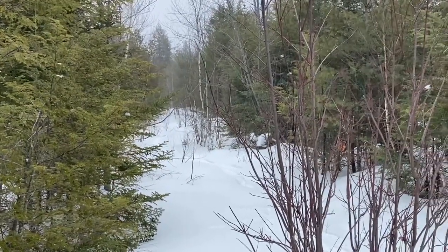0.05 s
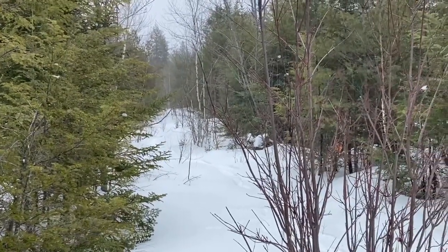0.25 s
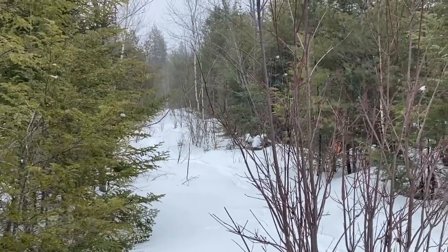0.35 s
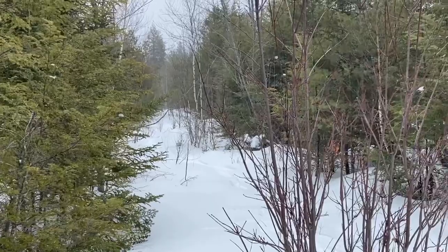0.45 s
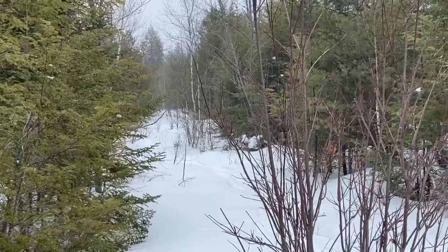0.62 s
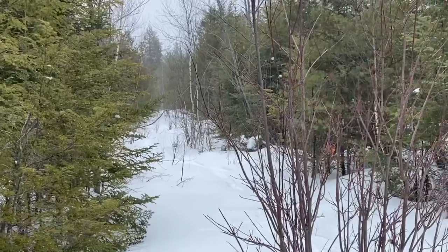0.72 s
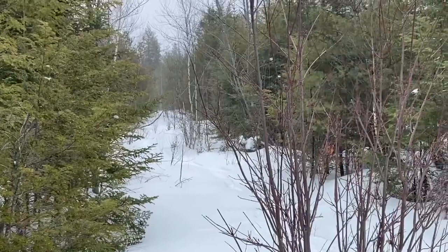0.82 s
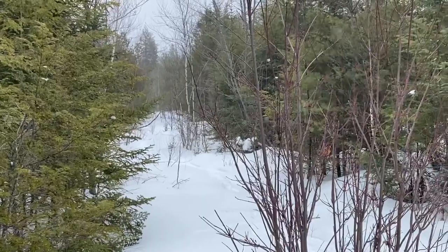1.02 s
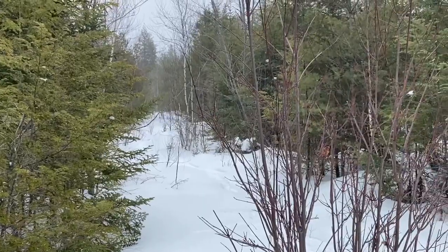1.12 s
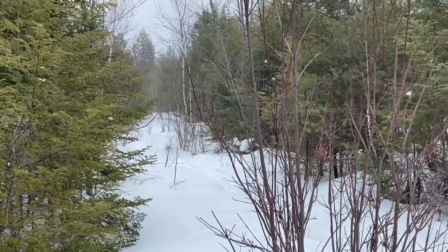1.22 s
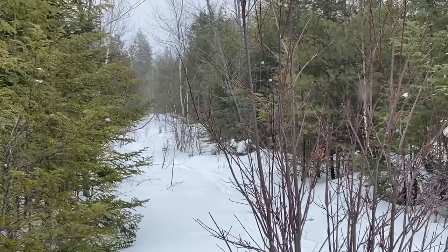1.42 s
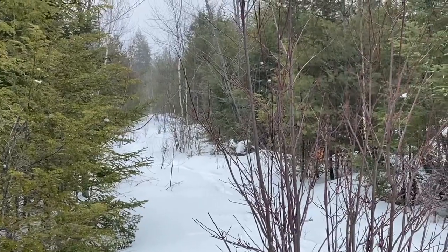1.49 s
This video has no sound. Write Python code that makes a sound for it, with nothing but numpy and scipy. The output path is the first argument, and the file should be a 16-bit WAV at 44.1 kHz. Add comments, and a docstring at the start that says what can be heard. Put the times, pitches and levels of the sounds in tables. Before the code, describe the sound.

Hunting dogs yelp and bawl one after another, their cries ringing through still winter trees

```python
"""Snowy woods in still winter air, with hounds giving tongue on a scent: the end of a far call, a high yelp
that breaks downward, a bawl that starts clean and turns hoarse, and a weaker hoarse bay. Each voice is a stack
of harmonics that gives way to a rasp ringing the throat; the trees scatter it into a long tail of shaped noise.
Small birds whistle faintly as arched sine glides, a few ice grains tick close by as bursts of filtered noise,
and coloured noise makes the low rumble and faint hiss of the air."""
import sys
import numpy as np
from scipy import signal
from scipy.fft import rfft, irfft
from scipy.io import wavfile
from scipy.ndimage import uniform_filter1d

SR = 44100
rng = np.random.default_rng(int(sys.argv[2]) if len(sys.argv) > 2 else 0)


def unload_audio(sound):
    """Save the sound as a 16-bit wav file, at the path given as the first command line argument."""
    columns = np.transpose(np.atleast_2d(sound))
    # keep every value between -1 and 1, then stretch to whole-number steps
    steps = np.round(np.clip(columns, -1, 1) * 32767)
    wavfile.write(sys.argv[1], SR, steps.astype(np.int16))


N = 68355
TIME = np.arange(N) / SR

# Course of each call: start_s, pitch_hz, level_db, second_harmonic_db, higher_harmonics_db,
# half_pitch_db, roughness (0-1, held to 0.95); the levels are fader moves on the voice's parts
FAR_CALL = [(0.0, 798.4, -57.5, -10, -7, -37.5, 0.11), (0.03, 971, -63, -9, -15.5, -34, 0.2),
            (0.06, 1150, -70.5, -6, -17.5, -32, 0.2), (0.08, 1040, -78.5, -17.5, -20.5, -22.5, .2)]
YELP = [(0.174, 1156, -46, -1, 6.5, -39.5, .01), (0.189, 1278, -41.5, 3.5, 2, -41, 0.0047),
        (0.213, 1385, -33.5, -4, 7.5, -34, .002), (0.229, 1343, -28.5, 3, -1.5, -37.5, 0.0009),
        (0.249, 1304, -26.5, -2.5, -4, -34.5, 0.0028), (0.261, 1287, -19.5, -5, -9, -34, 0.0012),
        (0.288, 1283, -18.5, -13.5, -11.5, -36.5, 0.0013), (0.308, 1285, -21, -5, -14, -18.5, 0.0029),
        (0.319, 1227, -29, -2, -4.5, -16, 0.013), (0.326, 1036, -27, -11, -25, -29.5, 0.026),
        (0.333, 864, -22, -11.5, -30, -37.5, .03), (0.341, 753, -25, -2, -21, -24.5, 0.029),
        (0.348, 605, -43, -12, -39.5, -24.5, 0.025)]
BAWL = [(0.624, 836.1, -35.5, 3, -4, -31, 0.04), (0.633, 891.9, -35.5, -4.5, 1, -25.5, 0.026),
        (0.648, 1077, -30.5, 3.5, 2.5, -17.5, 0.046), (0.676, 1084, -29.5, -0.5, -1, -20, .07),
        (0.686, 1138, -27.5, -18, -22, -24, 0.53), (0.700, 1188, -25, -17, -20, -9, .5),
        (0.734, 1213, -23.5, -24, -20, -5, 0.63), (0.757, 1152, -28.5, -6.5, -6, -14.5, 0.45),
        (0.772, 1101, -32.5, 4, -8, -36.5, 0.2), (0.790, 1038, -33, -21, -4, -20, 0.069),
        (0.805, 884, -36.5, -4.5, -8, -26, 0.16), (0.819, 752, -37, -17.5, -23, -19, 0.092)]
BAY = [(1.344, 874.3, -47.5, -20, 2, -23, 0.011), (1.356, 876.8, -36.5, -19, -4, -28, 0.0064),
       (1.371, 903.4, -42, 6, 6, -23, 0.031), (1.378, 997.4, -39, 3.5, 2, -18, .3),
       (1.395, 1024, -44.5, 17.5, 6.5, 6, 0.48), (1.412, 1184, -38.5, 1, 6, -34, 0.45),
       (1.432, 1030, -39, -10, -12, -31, 0.52), (1.455, 1050, -36.5, -11, -11, -13, 0.48),
       (1.475, 1116, -43.5, -15, -6, 4, 0.61), (1.500, 1165, -48, -8, -8, 13.5, 0.98),
       (1.525, 1160, -54, 18, 10, -11, 1)]
# Base strength of harmonics 1, 2, 3 .. in each voice, before the call and the mouth shape them: level_db
FAR_HARMONICS = [0, 0, -2.5]
YELP_HARMONICS = [-1, -11, -26.5, -28, -39, -39]
BAWL_HARMONICS = [0.5, -10.5, -14.5, -29, -46.5, -36.5]
BAY_HARMONICS = [1.5, -23, -19, -24.5]
# Throat and mouth resonances of the hoarse voice: centre_hz, width_hz (before narrowing), relative level_db
BAWL_THROAT = [(550.5, 49, 3), (706, 89, 6.5), (1157, 220, 0.5), (1622, 250, -8), (2316, 130, -6.5),
               (2983, 67, -21.5)]
BAY_THROAT = [(581, 120, 2.5), (719, 120, 1), (1036, 53, -5), (1492, 360, -9), (2327, 82, -5.5),
              (3070, 310, -14.5)]
# How the open mouth passes the overtones: frequency_hz, gain_db
MOUTH_COLOUR = [(600, -13), (1500, 2.5), (2200, 1), (2700, -3.5), (2950, -8), (3250, -7), (3700, -13),
                (4900, -13.5), (5200, -9), (8000, -5.5), (11000, -35)]
# Stereo balance of the direct hounds: frequency_hz, left_minus_right_db
HOUND_PAN = [(600, -3.5), (1200, -4), (1700, 1.8), (2300, 0)]

# Echoes off single trunks: delay_s, level_db
TRUNK_ECHOES = [(.019, -18.5), (0.042, -27)]
# What the trees send back, far and near: frequency_hz, gain_db
FAR_TREES_COLOUR = [(700, -4), (1020, -1.5), (1200, 2), (1500, -3.5), (2200, -0.5), (2600, -7.5),
                    (3400, -28)]
NEAR_TREES_COLOUR = [(400, -23), (700, -2), (1000, -1.5), (1200, 1), (1400, -1.5), (1700, 1), (2300, 2.5),
                     (2650, 4), (3000, 2), (4000, 7.5), (5300, 8.5), (12000, 4.5)]
# Left-right likeness of the scatter: frequency_hz, likeness (0 to 1)
SCATTER_LIKENESS = [(600, 0), (1200, 0.2), (1700, 1), (2300, 0.98), (5000, 0.96)]

# Bird whistles: start_s, length_s, start_hz, end_hz, level_db (before the direct and scatter gains)
BIRDS = [(0.059, 0.04, 4180, 4056, -74.5), (0.116, 0.06, 3990, 3780, -77.5),
         (0.139, 0.042, 7120, 7710, -76), (0.366, 0.058, 7200, 7660, -73.5), (0.846, 0.11, 6070, 6080, -78)]
# Ice grains: start_s, level_db (before the band filters), centre_hz
TICKS = [(.3194, -41.5, 7450), (0.625, -38.5, 11040), (.928, -46, 4500), (1.1445, -40, 8200),
         (1.4082, -29.5, 8850)]
# Left-right likeness of the ticks: frequency_hz, likeness (-1 to 1)
TICK_LIKENESS = [(4000, 0.63), (7000, 0.16), (10000, 0.48)]

# Spectrum of the still air: frequency_hz, relative density_db (per hertz)
AIR_COLOUR = [(25, -21), (45, -8), (75, 2.6), (130, 0), (250, -3), (500, -6), (1100, -5), (2200, -15),
              (3600, -24), (5500, -21), (7500, -16), (9000, -19), (12500, -18), (14000, -26), (15500, -20)]
# Left-right likeness of the air: frequency_hz, likeness (0 to 1)
AIR_LIKENESS = [(60, 1), (300, 0.62), (1000, .6), (3000, 1), (6000, 1), (8000, 0.26), (12000, 0.32)]

# Hound voices; every _RATE_HZ is the lowpass corner of a random drift
HOARSE_BAND_HZ, HOARSE_HISS_DB = (629, 2750), -38.5
VOICE_LOW_HZ = 520   # the voices are rolled off below this
ATTACK_S, RELEASE_S = 0.0021, 0.0021
WAVER, JITTER, JITTER_RATE_HZ = .003, .06, 180   # pitch scatter as a fraction: clean, and added per unit roughness
SHIMMER_DB, SHIMMER_RATE_HZ = 3.5, 124   # level scatter of the note per unit roughness
BLUR_RAD, BLUR_RATE_HZ = 4, 350   # phase scatter per harmonic step above the second, per unit roughness
# The throat strains and gives: its ring runs early and late, which bends the resonances
THROAT_WANDER_S, THROAT_WANDER_RATE_HZ = 0.00019, 22.8
HOUND_LAG_S = .00002   # the left ear hears them later
SCATTER_EVENING = 0.36   # share of a call's swell that comes from facing the listener, missing in the scatter

# Woods
NEAR_TREES_DB, NEAR_TREES_T60_S = -7.5, 0.67
FAR_TREES_DB, FAR_TREES_T60_S = -18.5, 2.13
SCATTER_BUILD_S = 0.01
RUN_SWAY_S, RUN_SWAY_RATE_HZ = 0.00015, 13.5   # the echo paths change as the hounds run

# Birds, ice and air
BIRD_ARCH_HZ, BIRD_WAVER, BIRD_WAVER_RATE_HZ = 100, 0.0073, 140   # the waver is a fraction of pitch
BIRD_DIRECT_DB, BIRD_SCATTER_DB = 0.5, 3
TICK_DECAY_S, TICK_TOP_HZ = 0.00062, 11860
TICK_WIDTH = 1.31   # ratio of band edge to centre
LOW_CHIRP_DB, LOW_CHIRP_START_HZ, LOW_CHIRP_DECAY_S = -45.5, 417, 0.0058
LOW_CHIRP_SAG_S = 0.0071   # time constant of the sine's fall in pitch
AIR_DB = -65.5
TOP_STOP_HZ = 16400


def hound(call, harmonics, throat, breath, rasp_db, scatter_db, scatter_treble_db):
    """A clean note gains half-pitch lines, jitter and rasp as it breaks up: (to the listener, to the trees)."""
    s, *columns = np.transpose(call)
    hz, db, second_db, higher_db, half_db, rough = [np.interp(TIME, s, column) for column in columns]
    rough = np.clip(rough, 0, .95)
    pitch_scatter = (WAVER + JITTER * rough) * drift(JITTER_RATE_HZ)
    phase = 2 * np.pi * np.cumsum(hz * (1 + pitch_scatter)) / SR

    # High overtones lose their footing as the voice roughens
    partials = []
    for k, level_db in enumerate(harmonics[1:], 2):
        slip = (k - 2) * BLUR_RAD * rough * drift(BLUR_RATE_HZ)
        partials.append(from_db(level_db) * np.sin(k * phase + slip))
    second, *higher = partials
    overtones = from_db(second_db) * second + from_db(higher_db) * sum(higher)
    note = from_db(harmonics[0]) * np.sin(phase) + colour(overtones, MOUTH_COLOUR)

    # Half-pitch lines between the harmonics
    halves = np.sin(phase / 2)
    halves = halves + from_db(-11.5) * np.sin(1.5 * phase) + from_db(-20.0) * np.sin(2.5 * phase)
    note = note + from_db(half_db) * butter(halves, HOARSE_BAND_HZ[0], "high", order=6)
    note = np.sqrt(2) * note * from_db(SHIMMER_DB * rough * drift(SHIMMER_RATE_HZ))

    # Roughness crossfades the note into the rasp
    hoarse = from_db(rasp_db) * rough * rasp(phase, throat, breath)
    gate = np.clip((TIME - s[0]) / ATTACK_S, 0, 1) * np.clip((s[-1] - TIME) / RELEASE_S, 0, 1)
    voice = gate * from_db(db) * (np.sqrt(1 - rough) * note + hoarse)
    voice = butter(voice, VOICE_LOW_HZ, "high", order=8)

    during_call = (TIME > s[0]) & (TIME < s[-1])
    swell_db = db - db[during_call].mean()
    aside = voice * from_db(scatter_db - SCATTER_EVENING * swell_db)
    to_trees = colour(aside, [(1400, 0.0023), (2500, scatter_treble_db)])
    return np.array([voice, to_trees])


def rasp(phase, throat, breath):
    """Uneven slaps of the folds at half pitch, with puffs of air, ring the throat; level evened."""
    slaps = np.diff(np.floor(phase / (4 * np.pi)), prepend=0) * (1 + 1.6 * rng.standard_normal(N))
    puffs = rng.standard_normal(N) * (1 + np.cos(phase / 2))
    source = rms_one(slaps) + breath * puffs
    voice = 0
    for hz, width_hz, db in throat:
        once = resonance(source, hz, 0.9 * width_hz)
        voice = voice + from_db(db) * resonance(once, hz, 0.9 * width_hz)
    voice = delayed(voice, THROAT_WANDER_S * drift(THROAT_WANDER_RATE_HZ))
    voice = rms_one(butter(voice, HOARSE_BAND_HZ, "band", order=6))
    hiss = rms_one(butter(source, [2500, 7000], "band"))
    voice = voice + from_db(HOARSE_HISS_DB) * hiss
    power = uniform_filter1d(voice ** 2, int(0.018 * SR))
    return voice / np.sqrt(power + 1e-6)


def woods(x):
    """Two trunk echoes, then dense scatter from near trees and a duller, longer one from far trees."""
    out = sum(from_db(db) * delayed(x, s) for s, db in TRUNK_ECHOES)
    near = (NEAR_TREES_COLOUR, NEAR_TREES_DB, NEAR_TREES_T60_S)
    far = (FAR_TREES_COLOUR, FAR_TREES_DB, FAR_TREES_T60_S)
    for spectrum, db, t60 in (near, far):
        build = 1 - np.exp(-(TIME / SCATTER_BUILD_S) ** 2)
        fade = from_db(-60 * TIME / t60) * build
        for _ in range(2):   # two tails that sway independently
            noise = colour(two_ears(SCATTER_LIKENESS), spectrum)
            tail = fade / np.sqrt(2 * np.sum(fade ** 2)) * noise
            sway = RUN_SWAY_S * drift(RUN_SWAY_RATE_HZ)
            scatter = [delayed(signal.fftconvolve(x, ear)[:N], sway) for ear in tail]
            out = out + from_db(db) * np.array(scatter)
    return out


def birds():
    """Thin whistles: sine glides whose pitch and loudness arch up and down."""
    out = 0
    for s, length_s, start_hz, end_hz, db in BIRDS:
        progress = np.clip((TIME - s) / length_s, 0, 1)
        arch = np.abs(np.sin(np.pi * progress))
        glide_hz = start_hz + (end_hz - start_hz) * progress + BIRD_ARCH_HZ * arch
        hz = glide_hz * (1 + BIRD_WAVER * drift(BIRD_WAVER_RATE_HZ))
        out = out + from_db(db) * np.sqrt(2 * arch) * np.sin(2 * np.pi * np.cumsum(hz) / SR)
    return out


def ice_grains():
    """Tiny dry ticks of decaying band noise; a brief low sine falling in pitch starts with the strongest."""
    out, crackle = 0, two_ears(TICK_LIKENESS)
    for s, db, hz in TICKS:
        burst = (TIME >= s) * np.exp(-np.abs(TIME - s) / TICK_DECAY_S) * crackle
        tick = butter(burst, [hz / TICK_WIDTH, hz * TICK_WIDTH], "band")
        out = out + from_db(db) * butter(tick, TICK_TOP_HZ, "low", order=4)
    strongest = max(TICKS, key=lambda row: row[1])
    age = np.maximum(TIME - strongest[0], 0)
    turns = LOW_CHIRP_START_HZ * LOW_CHIRP_SAG_S * (1 - np.exp(-age / LOW_CHIRP_SAG_S))
    low_chirp = np.exp(-age / LOW_CHIRP_DECAY_S) * np.sin(2 * np.pi * turns)
    return out + from_db(LOW_CHIRP_DB) * low_chirp


def air():
    """Steady low rumble and faint hiss from coloured stereo noise."""
    return from_db(AIR_DB) * rms_one(colour(two_ears(AIR_LIKENESS), AIR_COLOUR))


def two_ears(likeness):
    """White noise for left and right, alike to a degree that depends on frequency."""
    mid, side = rfft(rng.standard_normal((2, N)))
    alike = np.clip(at_hz(likeness, N), -1, 1)
    shared = np.sqrt((1 + alike) / 2) * mid
    opposed = np.sqrt((1 - alike) / 2) * side
    return irfft(shared + opposed * [[1], [-1]], N)


def drift(rate_hz):
    """Smooth random wander with unit rms: noise lowpassed at rate_hz."""
    return rms_one(butter(rng.standard_normal(2 * N), rate_hz, "low")[N:])   # filter settled by the second half


def resonance(x, hz, width_hz):
    """Two-pole resonance with gain near 1 on top."""
    r = np.exp(-np.pi * width_hz / SR)
    feedback = [1, -2 * r * np.cos(2 * np.pi * hz / SR), r * r]
    return signal.lfilter(np.array([1, 0, -1]) * (1 - r * r) / 2, feedback, x)


def delayed(x, s):
    """The same sound, later by s seconds, which may vary over time."""
    return np.interp(TIME - s, TIME, x, left=0)


def colour(x, points):
    """Equalise a sound with the gain curve of a table."""
    size = x.shape[-1] + 4096   # padding against wrap-around
    return irfft(rfft(x, size) * from_db(at_hz(points, size)), size)[..., :x.shape[-1]]


def at_hz(points, size):
    """A frequency table read on a log scale at the bins of a transform of this size."""
    hz, value = np.transpose(points)
    bins_hz = np.arange(size // 2 + 1) * SR / size
    return np.interp(np.log(bins_hz + 1), np.log(hz), value)


def butter(x, hz, kind, order=2):
    """Butterworth filter."""
    sos = signal.butter(order, np.clip(hz, 10, .45 * SR), kind, fs=SR, output="sos")
    return signal.sosfilt(sos, x + 1e-18)


def from_db(db):
    """Decibels to gain."""
    return 10 ** (np.asarray(db) / 20)


def rms_one(x):
    """Scale to unit rms."""
    return x / np.sqrt(np.mean(x ** 2) + 1e-20)


def scene():
    """The pack with a frequency-dependent pan, its echoes, birds among the trees, ice grains and air."""
    far = hound(FAR_CALL, FAR_HARMONICS, BAY_THROAT, breath=.8,
                rasp_db=6.5, scatter_db=6.5, scatter_treble_db=-16.5)
    yelp = hound(YELP, YELP_HARMONICS, BAWL_THROAT, breath=0.87,
                 rasp_db=17, scatter_db=-2, scatter_treble_db=2.5)
    bawl = hound(BAWL, BAWL_HARMONICS, BAWL_THROAT, breath=0.72,
                 rasp_db=1.5, scatter_db=1.5, scatter_treble_db=1.5)
    bay = hound(BAY, BAY_HARMONICS, BAY_THROAT, breath=1.0,
                rasp_db=2.2, scatter_db=3.0, scatter_treble_db=0.0)
    to_listener, to_trees = far + yelp + bawl + bay
    left = colour(delayed(to_listener, HOUND_LAG_S), [(hz, db / 2) for hz, db in HOUND_PAN])
    right = colour(to_listener, [(hz, -db / 2) for hz, db in HOUND_PAN])
    pack = np.array([left, right])
    whistles = birds()
    echoes = woods(to_trees + from_db(BIRD_SCATTER_DB) * whistles)
    return pack + from_db(BIRD_DIRECT_DB) * whistles + echoes + ice_grains() + air()


def record(dry):
    """Cut the top steeply: 60 dB down from TOP_STOP_HZ up."""
    return signal.sosfilt(signal.cheby2(16, 60, TOP_STOP_HZ, fs=SR, output="sos"), dry)


dry = scene()
out = record(dry)
unload_audio(out)
```